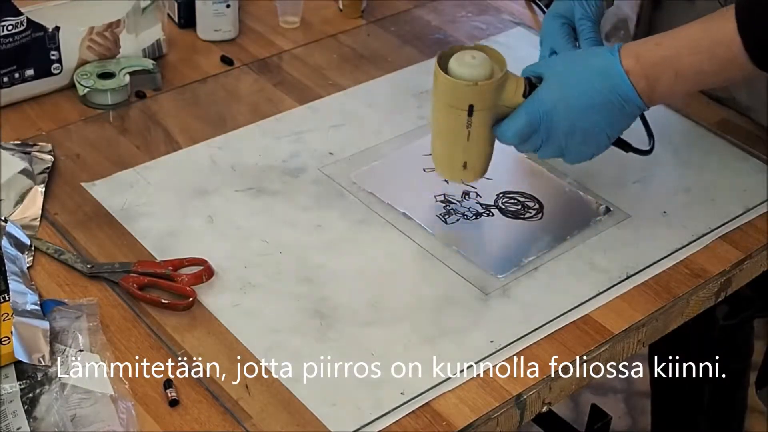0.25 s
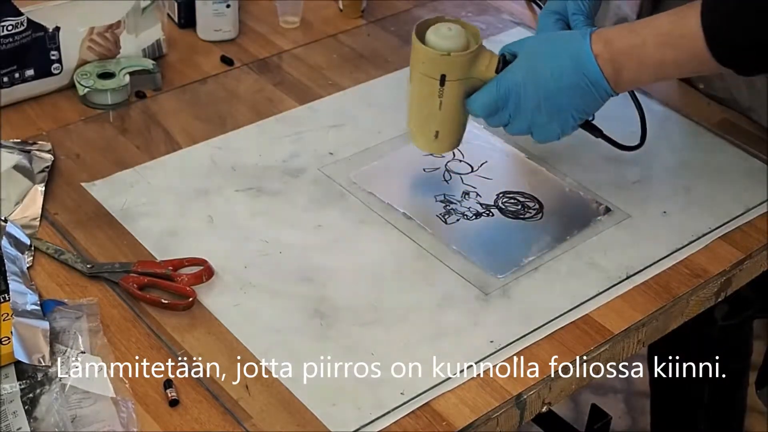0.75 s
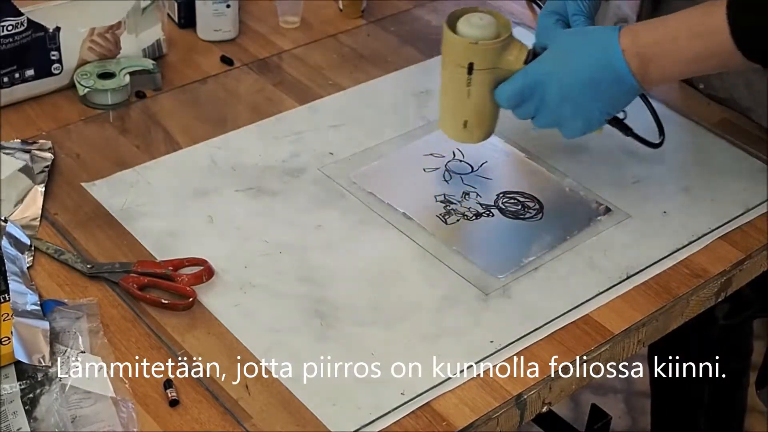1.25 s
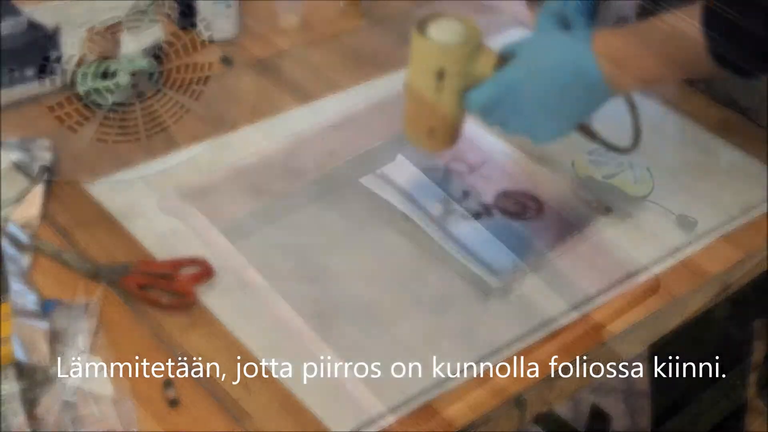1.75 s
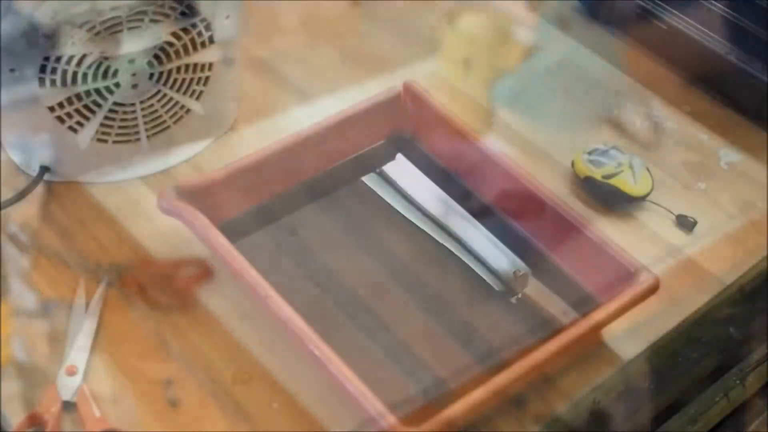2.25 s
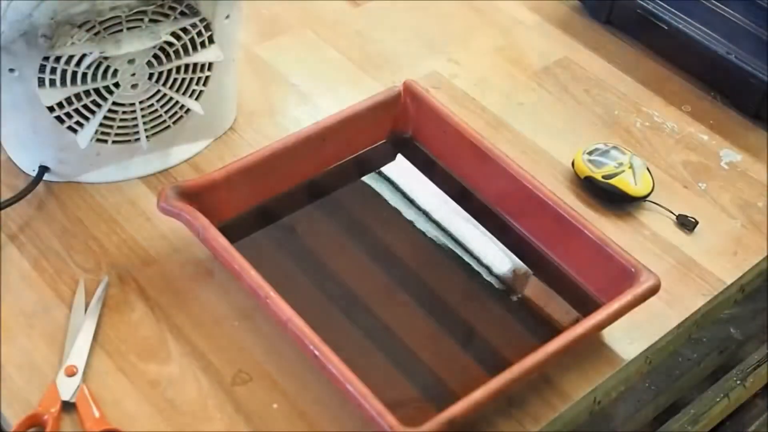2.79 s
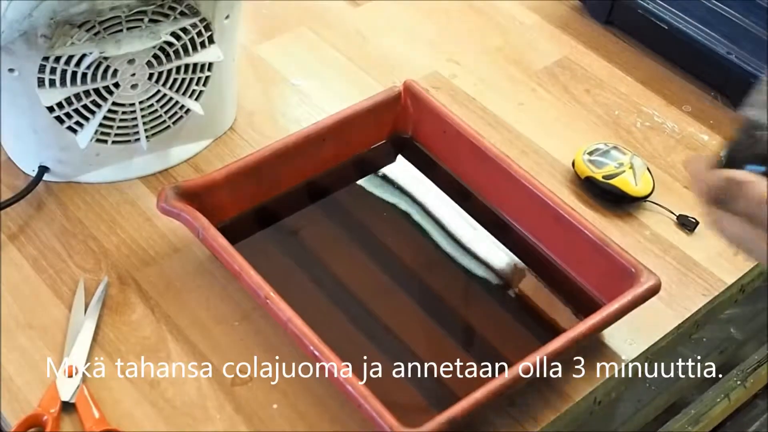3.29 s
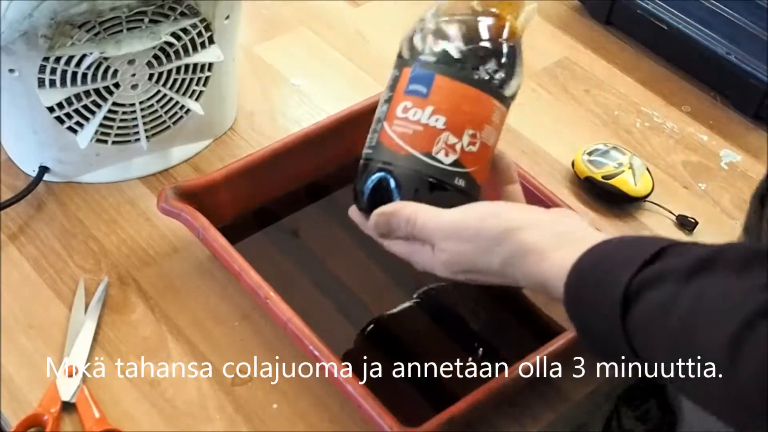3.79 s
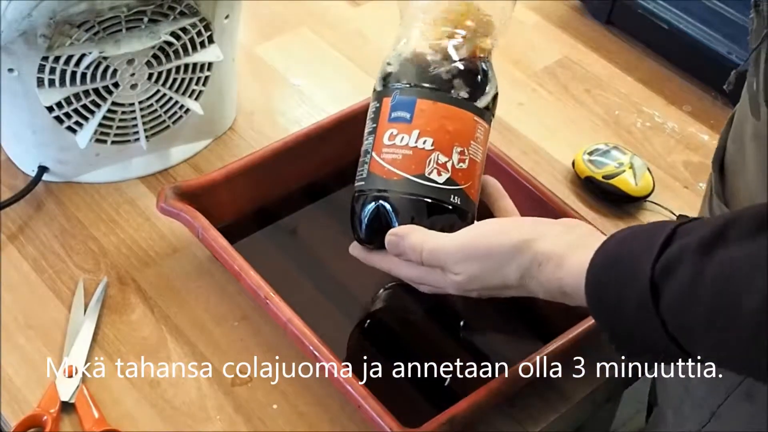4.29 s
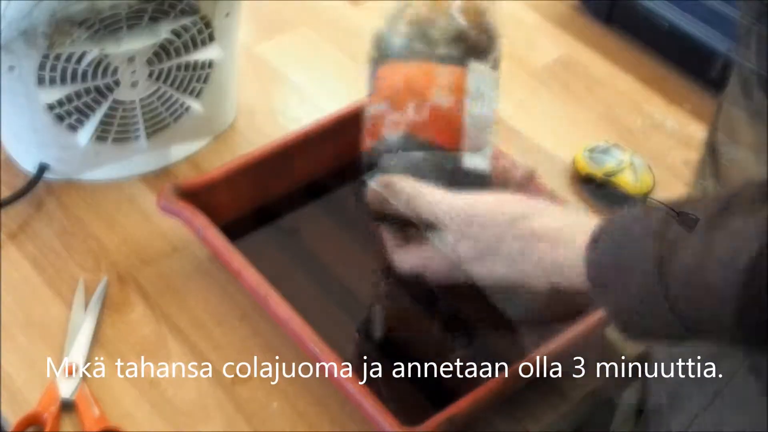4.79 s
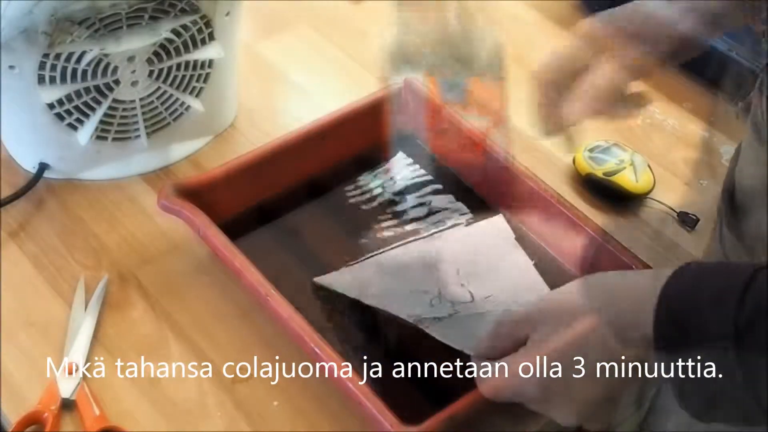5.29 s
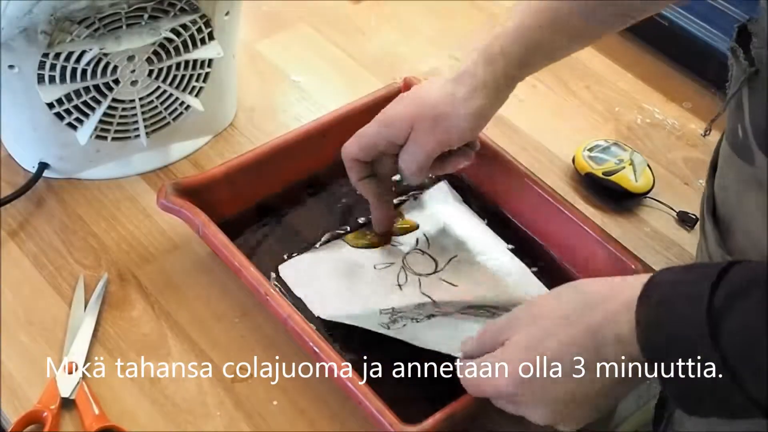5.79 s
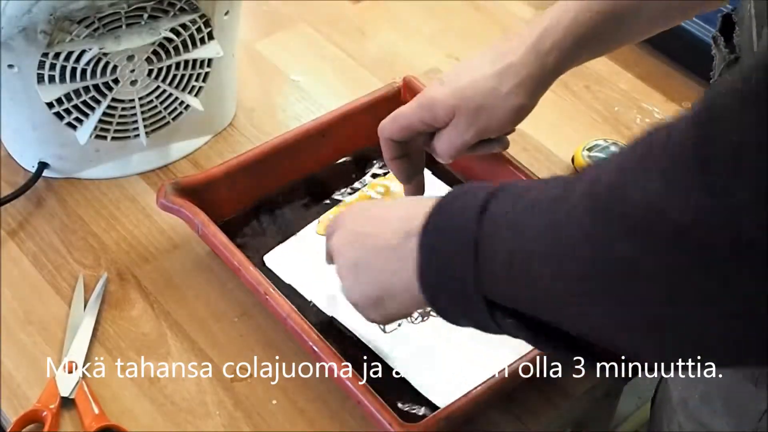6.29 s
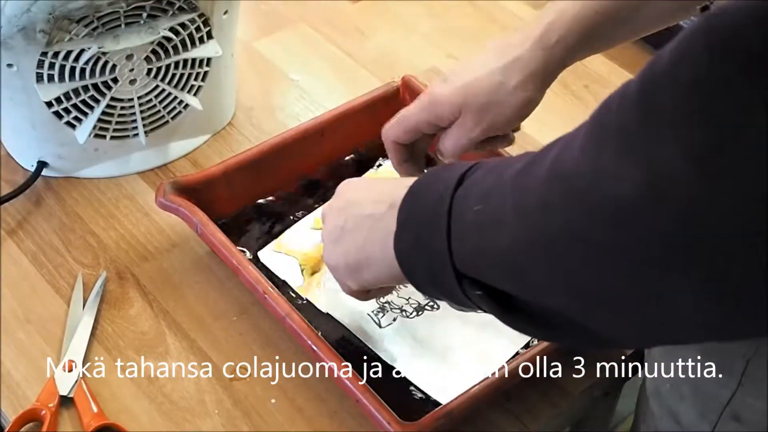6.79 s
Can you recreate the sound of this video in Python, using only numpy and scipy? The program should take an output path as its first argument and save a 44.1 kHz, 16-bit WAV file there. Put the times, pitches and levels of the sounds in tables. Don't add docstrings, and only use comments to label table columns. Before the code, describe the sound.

A small hair dryer blows close over a table, a steady piercing whine above rushing hiss and low hum, wavering slightly as it moves. It fades smoothly to nothing around three seconds. A quiet indoor workroom remains, with light table knocks, soft sleeve swishes, a sharp crack of a plastic bottle set down near five seconds, then a tray knock and small wet paper flicks and squeaks. Close small stereo microphone, slightly dull at the very top.

```python
import sys
import numpy as np
from scipy import signal
from scipy.fft import rfft, irfft, next_fast_len
from scipy.io import wavfile

SR = 44100
rng = np.random.default_rng(int(sys.argv[2]) if len(sys.argv) > 2 else 0)


def volts_from_db(level):
    exponent = np.asarray(level, float) / 20
    return 10 ** exponent


def bounce(signal):
    frames = np.transpose(np.atleast_2d(signal))
    limited = np.clip(frames, -1, 1)
    pcm = np.round(limited * 32767).astype(np.int16)
    wavfile.write(sys.argv[1], SR, pcm)


N = 310905


def rms_one(x):
    return x / np.sqrt(np.mean(x ** 2) + 1e-20)


def in_time(rows):
    s, *columns = np.transpose(rows)
    return [np.interp(np.arange(N) / SR, s, c) for c in columns]


def at_hz(points, hz):
    point_hz, value = np.transpose(points)
    return np.interp(np.log(hz), np.log(point_hz), value)


def drift(rate):
    r = np.exp(-80 * np.pi * rate / SR)
    slow = signal.lfilter([1], [1, -2 * r, r * r], rng.standard_normal(N // 40 + 2002))[2000:]
    return np.interp(np.arange(N) / 40, np.arange(len(slow)), rms_one(slow))


def ring(clicks, hz, t60):
    r, w = volts_from_db(-60 / (t60 * SR)), 2 * np.pi * hz / SR
    return signal.lfilter([0, np.sin(w)], [1, -2 * r * np.cos(w), r * r], clicks + 1e-18)


def coloured(spectrum, likeness, grain_db=0):
    size = next_fast_len(N)
    grain = np.minimum(rng.exponential(1, size), 4)
    white = rng.standard_normal((2, size)) * volts_from_db(grain_db * grain)
    hz = np.maximum(np.fft.rfftfreq(size, 1 / SR), 10)
    mid, side = rfft(white) * volts_from_db(at_hz(spectrum, hz))
    alike = np.clip(at_hz(likeness, hz), 0, 1)
    mid, side = mid * np.sqrt(1 + alike), side * np.sqrt(1 - alike)
    return rms_one(irfft(np.array([mid + side, mid - side]), size)[:, :N])


def highpass(x, order, hz):
    return signal.sosfilt(signal.butter(order, hz, "high", fs=SR, output="sos"), x)


FADE_END_S = 2.985


def fade():
    return np.cos(np.pi / 2 * np.minimum(np.arange(N) / SR / FADE_END_S, 1))


# frequency in Hz, level in dB per Hz.
ROOM_TONE = [(20, -19), (60, -2), (170, 0), (410, -4.5), (1000, -9), (1400, -19.5), (1660, -12.5),
             (2320, -18.5), (4300, -21), (5000, -25.5), (10500, -24.5), (12300, -34.5), (13800, -35),
             (15800, -35)]
# frequency in Hz, left-right likeness from 0 to 1.
ROOM_LIKENESS = [(60, 0.48), (240, 0.69), (950, 0.64), (3770, 0.064), (10000, .1), (13000, .6)]
# time in seconds, level in dB.
ROOM_LEVEL = [(2.95, -44), (3.25, -44), (3.5, -46), (3.97, -45.5), (4.25, -47), (4.81, -46.5),
              (4.96, -42.5), (5.26, -53), (6.12, -55), (6.6, -52.5), (7.05, -51)]
ROOM_UNDER_DB, ROOM_RISE = -25, 1.23
ROOM_SWAY_DB = .9


def room_tone():
    level_db, = in_time(ROOM_LEVEL)
    under_db = ROOM_UNDER_DB * fade() ** ROOM_RISE
    gain = volts_from_db(level_db + under_db - 2.5 + ROOM_SWAY_DB * drift(3.8))
    return gain * coloured(ROOM_TONE, ROOM_LIKENESS)


ROOM_T60_S, WALL_CUT_HZ, ECHO_DB = 0.33, 7400, -26


def room_echo(x):
    out, dull = np.zeros((2, N)), np.exp(-2 * np.pi * WALL_CUT_HZ / SR)
    lags = (rng.uniform(.012, 0.037, 12) * SR).astype(int)
    for k, lag in enumerate(lags):
        loop, gain, state = x.copy(), volts_from_db(-60 * lag / SR / ROOM_T60_S), [0.]
        for i in range(lag, N, lag):
            back, state = signal.lfilter([gain * (1 - dull)], [1, -dull], loop[i - lag:i], zi=state)
            loop[i:i + lag] += back[:N - i]
        out[k % 2] += (loop - x) * (-1) ** (k // 2)
    return volts_from_db(ECHO_DB) * out


# peak time in seconds, rise in seconds, fall in seconds,
# scuff level in dB, extra brightness in dB.
STROKES = [(2.77, 0.37, 0.23, -36, 1), (3.02, 0.19, 0.34, -70, -11), (3.16, .08, 0.22, -55, 1),
           (3.24, 0.3, 0.15, -52.5, 4), (3.32, .06, 0.075, -52, -1), (3.5, 0.96, .4, -61, -8),
           (3.73, 0.31, 0.2, -45.5, -3), (3.85, 0.15, 0.36, -44.5, -7.5), (4.0, 0.26, 0.52, -57.5, -9),
           (4.62, 0.2, 0.2, -63.5, 4), (4.69, 0.076, 0.064, -53, 15.5), (4.85, 0.98, 0.16, -58.5, -7),
           (4.96, 0.14, 0.37, -53.5, -3.5), (5.62, 0.19, 0.47, -57.5, -20.5), (5.86, 0.19, 0.39, -51, -3.5),
           (6.04, 0.029, 0.23, -46.5, 11.5), (6.13, 0.15, 0.056, -53.5, 10), (6.2, 0.084, 0.36, -55, -13),
           (6.6, 0.14, 0.57, -59, -31.5), (6.78, 0.34, 0.3, -72, -37), (7.05, 0.14, .3, -58, -32)]
AT_REST_DB = [-67.5, -75.5, -92]
STROKE_RANGE_DB, BRIGHT_STEEPER = 27, 1.44
RUB_DB, RUB_PER_BRIGHT = -7, -0.52


def strokes():
    t = np.arange(N) / SR
    out = np.ones((3, N)) * volts_from_db(np.array(AT_REST_DB))[:, None]
    for s, rise_s, fall_s, scuff_db, bright_db in STROKES:
        near = slice(round((s - 3 * rise_s) * SR), round((s + 3 * fall_s) * SR))
        lost_db = STROKE_RANGE_DB * np.maximum((s - t[near]) / rise_s, (t[near] - s) / fall_s)
        rub_db = RUB_DB + RUB_PER_BRIGHT * bright_db
        for k, (lift_db, steep) in enumerate([(rub_db, 1), (0, 1), (bright_db, BRIGHT_STEEPER)]):
            stroke = volts_from_db(scuff_db + lift_db - steep * lost_db)
            out[k, near] = np.hypot(out[k, near], stroke)
    return out


# frequency in Hz, level in dB per Hz.
RUB = [(300, -6), (650, 10.5), (1250, 6.5), (1750, 11), (2500, -1), (4200, -1.5), (6000, -67)]
SCUFF = [(1200, -15), (1800, -8), (2800, 3), (4300, 1.5), (6000, -6.5), (8000, -7), (11000, -36)]
CLOTH = [(3500, -20), (5500, -7), (8000, -2), (10000, 0), (11500, -4), (13000, -12), (15000, -12),
         (16000, -9)]
# start in seconds, bright peak in dB, time to fall 60 dB in seconds,
# scuff share in dB.
FLICKS = [(3.1377, -41, 0.05, -11), (3.274, -43, .06, -28), (3.283, -44, .07, -28), (3.291, -48, .04, -25),
          (3.3797, -49, 0.15, -16), (4.681, -46, .07, -14), (4.8554, -49, 0.036, -13),
          (5.0035, -49, .06, -15), (5.0644, -47, .052, -10), (5.1044, -53, 0.041, -4),
          (5.36, -44.5, 0.055, -9), (5.379, -44.5, 0.054, -10), (5.5049, -45.5, 0.058, -8),
          (5.5748, -36, 0.084, -12), (5.612, -37, 0.045, -10), (5.757, -41.5, 0.07, -9),
          (5.7794, -53, .05, -4), (5.832, -58, .1, -14), (5.843, -49, .05, -17), (5.862, -36, 0.05, -22),
          (5.865, -41, 0.15, -18), (3.8785, -46, .02, 3), (3.884, -48, .02, 2), (6.012, -54, .1, -10),
          (5.9394, -50, 0.04, -9), (6.024, -41, .14, -17), (6.577, -53, 0.063, -1), (7.0, -80, 0.83, -4)]
RUB_SWAY_DB = 1.2


def rustles():
    rub_gain, scuff_gain, bright_gain = strokes()
    start = np.clip((np.arange(N) / SR - 2.6) / 0.36, 0, 1)
    close = [(500, 1.0), (8000, 0.56)]   # Hz, left-right likeness
    flick, t = np.zeros((2, N)), np.arange(N // 20) / SR
    for s, peak_db, t60, share_db in FLICKS:
        i = round(s * SR)
        onset = np.minimum(t / 0.00061, 1)
        fall = volts_from_db(peak_db - 2.5 - 60 * t / max(t60, .01)) * onset
        flick[:, i:i + len(t)] += fall[:N - i] * volts_from_db([[share_db + 7.0], [0]])
    fibres = 1.1 * drift(30)
    rub = rub_gain * volts_from_db(RUB_SWAY_DB * drift(25)) * coloured(RUB, close, grain_db=-4.5)
    scuff = (scuff_gain * volts_from_db(0.6 + fibres) + flick[0]) * coloured(SCUFF, close, grain_db=3.0)
    cloth = (bright_gain * volts_from_db(fibres) + flick[1]) * coloured(CLOTH, close, grain_db=3.0)
    return start * (rub + scuff + cloth) * volts_from_db([[.3], [-.3]])


# frequency in Hz, level in dB per Hz.
SWEEP = [(710, -31), (1200, -6), (1330, -14), (1650, -4), (2120, -3.5), (4590, -2), (10600, -5.5),
         (12900, -16), (15000, -16)]
# peak time in seconds, rise in seconds, fall in seconds, level in dB.
SWEEPS = [
    (3.63, 0.34, 0.21, -45.5),
    (3.725, 0.2, 0.2, -38),
    (3.755, .1, .15, -42),
    (3.85, 0.22, 0.17, -34.5),
    (3.885, 0.11, 0.13, -45),
    (4.69, .06, .06, -46),
]


def sweeps():
    t, power = np.arange(N) / SR, 0
    for s, rise_s, fall_s, level_db in SWEEPS:
        lost_db = STROKE_RANGE_DB * np.maximum((s - t) / rise_s, (t - s) / fall_s)
        power = power + volts_from_db(level_db - lost_db) ** 2
    swish = coloured(SWEEP, [(500, 1.0), (8000, 0.2)], grain_db=0.0)
    return np.sqrt(power) * volts_from_db(.8 * drift(45)) * swish


# start in seconds, length in seconds, pitch in Hz, level in dB.
SQUEAKS = [(5.611, .014, 3650, -52), (5.612, 0.017, 2700, -57), (5.862, .02, 3840, -48),
           (5.896, 0.033, 3900, -53), (6.04, 0.053, 10300, -44), (6.046, 0.037, 4230, -48),
           (6.189, .03, 2600, -52.5), (3.723, .03, 1800, -53), (4.648, .04, 7550, -52),
           (4.682, .014, 5900, -48), (4.686, .014, 9000, -47), (5.584, .012, 3900, -50),
           (3.2, .05, 3100, -55)]
SQUEAK_WIDTH = 0.08


def squeaks():
    out = np.zeros(N)
    for s, length_s, hz, level_db in SQUEAKS:
        n, i = round(length_s * SR), round(s * SR)
        edges_hz = [hz * (1 - SQUEAK_WIDTH / 2), hz * (1 + SQUEAK_WIDTH / 2)]
        band = signal.butter(2, edges_hz, "band", fs=SR, output="sos")
        puff = rms_one(signal.sosfilt(band, rng.standard_normal(4000))[-n:])
        out[i:i + n] += volts_from_db(level_db) * puff * np.sin(np.pi * (np.arange(n) / n) ** .5)
    return out


# start in seconds, level in dB, pitch in Hz,
# time to fall 60 dB in seconds.
BUMPS = [
    (1.989, -31, 145, 0.083),
    (1.99, -47, 70, .15),
    (1.998, -39, 250, .05),
    (2.836, -50, 110, .1),
    (2.838, -46, 350, .06),
    (3.108, -46, 330, .06),
    (4.862, -48, 620, .12),
    (4.875, -50, 450, .1),
    (4.96, -50, 520, .12),
]


def bumps():
    out, click = np.zeros(N), np.eye(1, N // 20)[0]
    for s, level_db, hz, t60 in BUMPS:
        out[round(s * SR):][:len(click)] -= volts_from_db(level_db) * ring(click, hz, t60)
    return out


# pitch in Hz, level in dB,
# time to fall 60 dB in seconds.
TABLE = [(133, -3, 0.058), (171.7, -1.5, 0.15), (223, -13.5, 0.079), (265, -4.5, 0.13), (316, -5, 0.13)]
TRAY = [(393, 11, 0.027), (488, 5, 0.095), (578, 11, 0.055), (705, 4.5, 0.16), (765, 1, 0.065),
        (880, -4, 0.1), (995, 10.5, 0.06), (1210, -9, 0.045)]
EDGE = [(1340, -2, 0.062), (1490, 4, 0.027), (1644, 13.5, 0.035), (2040, 13.5, 0.033), (2340, 2, 0.02),
        (2600, 10, 0.036), (3030, 2, 0.036), (3580, 8, 0.016), (3650, -10, 0.017), (4150, -25, 0.013),
        (5100, -5, 0.016)]
CRACK = [(5470, -15, 0.005), (6330, -6, 0.011), (7500, -5.5, 0.0081), (8600, -3, 0.0051),
         (9600, -1.5, 0.0072), (10900, -1, 0.0043), (13800, -11, .005)]
# start in seconds, then the level in dB in table, tray, hard edge and crack.
KNOCKS = [(1.993, -40, -53, -65, -65), (2.697, -48, -51.5, -66, -76), (2.836, -54, -45.5, -61, -48),
          (3.063, -49, -48, -72, -62), (3.106, -38.5, -53, -68, -68), (3.138, -42, -61, -52.5, -49),
          (3.298, -47, -62, -44, -75), (3.351, -39, -60, -60, -60), (4.378, -46, -64, -76, -70),
          (4.629, -47, -66, -66, -80), (4.86, -40, -59, -63, -59), (4.884, -62, -57, -69, -58),
          (4.918, -33.5, -50, -46.5, -18.5), (5.49, -69, -64, -74, -70), (5.538, -38.5, -50, -53, -35),
          (5.593, -48, -55, -63, -58), (6.19, -59, -63, -60, -74), (6.229, -46, -66, -85, -95)]


def knocks():
    rows = np.array(KNOCKS)
    at = np.round((rows[:, 0] + 0.00106) * SR).astype(int)
    after_s = rng.uniform(0.00147, 0.0081, (len(at), 5))
    rattles = at[:, None] + (after_s * SR).astype(int)
    out = np.zeros(N)
    for column, body in enumerate([TABLE, TRAY, EDGE, CRACK]):
        for hz, level_db, t60 in body:
            clicks = np.zeros(N)
            uneven_db = rng.normal(0, 1.5, len(at))
            size = volts_from_db(rows[:, 1 + column] + level_db - 1.5 + uneven_db)
            clicks[at] = size * rng.choice([-1, 1], len(at))
            weaker = volts_from_db(-6.5 - 2000 * after_s) * rng.standard_normal(after_s.shape)
            clicks[rattles] = size[:, None] * weaker
            out += ring(clicks, hz, t60)
    return highpass(out, 4, 120)


# pitch in Hz, level in dB, time to fall 60 dB in seconds.
CAP = [(590, 7, 0.075), (714, 4, 0.035), (750, 11.5, 0.036), (970, 9, 0.043), (1210, -2, .02),
       (1530, -5, 0.022), (1890, 4.5, .03), (2350, -11, .03), (2810, 12.5, 0.025), (3280, 3, 0.033),
       (3840, -11, 0.018), (4600, -10, .012)]
BOTTLE = [(640, 0, .1), (707, -2, 0.069), (795, 4.5, 0.063), (1070, -8, .03), (1266, -1, 0.069),
          (1630, -14, .07), (2200, -11, 0.05), (2460, -1, 0.032), (2760, -3.5, 0.045), (3520, -10, 0.055),
          (4200, -3, 0.032)]
RIM = [(584, -12, 0.055), (790, 1, 0.11), (892, 11.5, 0.057), (1077, 5, 0.06), (1260, -7, .03),
       (1520, -8, 0.078), (2140, 0, 0.033), (2430, -12, .03), (2920, -21, .033), (3900, -5, 0.022)]
THUD = [(170, 13, 0.083), (202, 18, 0.09), (250, 8, .06), (670, 4, .06)]
FLOOR = [(285, 14, 0.055), (161, 4.4, 0.098), (560, 6, .07)]
TICK = [(2100, -4, .01), (3400, 0, .012), (8900, 4, .02), (10200, 3, .018), (11300, -2, .015)]
# start in seconds, blow level in dB,
# the thing that rings.
HELD = [(2.8385, -50, CAP), (3.2993, -40, CAP), (4.863, -57, THUD), (4.95, -56, THUD),
        (4.9196, -30, BOTTLE), (4.936, -50, THUD), (5.5396, -36, RIM), (5.5445, -49, FLOOR),
        (5.5935, -50, RIM), (5.5965, -50, RIM), (5.604, -49, RIM), (5.65, -56, RIM), (5.491, -59, RIM),
        (5.5395, -45, FLOOR), (4.9197, -50, FLOOR), (3.3057, -55, CAP), (3.316, -63, CAP),
        (4.9255, -42, TICK), (4.9345, -50, TICK), (5.577, -57, RIM)]
CONTACT_HZ, SMALL_BODY_HZ = 5000, 150
SNAP_DB, SNAP_HZ = -2, 3000
BURST_DB, BURST_T60_S, BURST_LOW_HZ, BURST_HIGH_HZ = -0.5, 0.1, 350, 4170


def held_knocks():
    out, t = np.zeros(N), np.arange(N // 20) / SR
    band = signal.butter(2, [BURST_LOW_HZ, BURST_HIGH_HZ], "band", fs=SR, output="sos")
    for s, blow_db, modes in HELD:
        i = round(s * SR)
        contact_hz = CONTACT_HZ * (3 if modes == TICK else 1)
        click = signal.lfilter(*signal.butter(2, contact_hz, fs=SR), np.eye(1, len(t))[0])
        hit = volts_from_db(blow_db + SNAP_DB) * ring(click, SNAP_HZ / 2, 2 / SNAP_HZ)
        for hz, level_db, t60 in modes:
            hit += volts_from_db(blow_db + level_db) * ring(click, hz, min(t60, .09))
        burst = rng.standard_normal(len(t)) * volts_from_db(blow_db + BURST_DB - 60 * t / BURST_T60_S)
        out[i:i + len(t)] += hit + signal.sosfilt(band, burst)
    return highpass(out, 4, SMALL_BODY_HZ)


def lift(x, hz, width_hz, lift_db):
    r = np.exp(-np.pi * width_hz / SR)
    top = np.array([1, 0, -1]) * (1 - r * r) / 2
    peak = signal.lfilter(top, [1, -2 * r * np.cos(2 * np.pi * hz / SR), r * r], x)
    return x + (volts_from_db(lift_db) - 1) * peak


# frequency in Hz, level in dB per Hz.
ROAR = [(35, -68), (60, -30), (199, -27), (260, -16.5), (324, -18), (1030, -8), (1430, -12), (1810, -6.5),
        (2190, -23.5), (2600, -9), (3380, -59), (5720, -120)]
HISS = [(1120, -23), (1900, -7.5), (1970, -9), (2170, -14), (2640, -7.5), (3510, -6), (3880, -6.5),
        (4240, -7), (5540, -10.5), (5890, -14), (6440, -10.5), (10800, -13.5), (13300, -27.5), (16000, -29)]
# frequency in Hz, left-right likeness from 0 to 1.
DRYER_LIKENESS = [(60, 1), (130, 1), (290, 1), (640, 1), (1410, 0.9), (3100, 0.92), (6820, 0.72),
                  (10000, .78), (12500, 0.97)]
# frequency in Hz, width in Hz, lift in dB.
DUCT = [(260, 40, 6), (330, 20, -5), (400, 50, 6), (460, 20, -6), (525, 30, 6.5), (570, 20, 5),
        (682, 25, 8.5), (720, 30, -6), (790, 30, 4), (835, 20, -8), (898, 50, 9.5), (985, 20, -7),
        (1020, 40, 9), (1092, 15, -8), (1118, 25, 5), (1180, 20, -6), (1215, 40, 4.5), (1460, 60, -4),
        (1510, 40, 4), (1680, 100, 3), (2580, 120, 5), (2705, 40, 4), (2950, 25, 3), (2990, 50, 4),
        (3040, 40, -5), (3078, 30, 7), (3120, 30, 3), (3345, 30, 2.5)]
HISS_DB, ROAR_DB, NEAR_ECHO_DB = -21.6, -27.9, -16
HISS_SWAY_DB = .35
HISS_FADE_POWER = 1.173


def blown_air():
    roar = volts_from_db(ROAR_DB - 4.0 + 0.13 * drift(3.3)) * coloured(ROAR, DRYER_LIKENESS)
    hiss = volts_from_db(HISS_DB - 0.56 + HISS_SWAY_DB * drift(9.1)) * coloured(HISS, DRYER_LIKENESS)
    air = highpass(roar + fade() ** (HISS_FADE_POWER - 1) * hiss, 2, 100)
    heard, blowing = 3 * SR + 9000, 3 * SR
    for resonance in DUCT:
        air[:, :heard] = lift(air[:, :heard], *resonance)
    direct = air[:, :blowing].copy()
    for lag in (rng.uniform(.003, .03, 6) * SR).astype(int):
        air[:, lag:lag + blowing] += volts_from_db(NEAR_ECHO_DB) * drift(2.5)[:blowing] * direct
    return air


# time in seconds,
# blade rate in Hz, first, second and third tone in dB.
WHINE = [(0, 1871, -25.5, -34, -42), (.44, 1873, -23.5, -37.5, -45), (.62, 1873, -25, -35, -45),
         (.73, 1871, -31, -34, -41), (.87, 1871, -28, -34.5, -37), (.95, 1871, -30, -30, -38),
         (1.08, 1871, -26, -42, -41), (1.22, 1871.5, -28, -44, -39), (1.3, 1872, -32.5, -32, -39),
         (1.38, 1872, -29, -31, -40), (1.5, 1872.5, -29, -43, -43), (1.67, 1873.5, -34, -35, -45),
         (1.8, 1874, -29, -44, -53), (1.98, 1874, -35, -33, -45), (2.14, 1874, -34, -42, -48),
         (2.55, 1874.5, -39.5, -47, -54), (2.86, 1874.5, -47, -50, -63), (2.97, 1874.5, -62, -61, -77)]
TONE_LAG = [.1, .35, .4]
BLADE_COUNT = 7


def blade_whine(turn):
    _, *tone_db = in_time(WHINE)
    whine = 0
    for k, level_db in enumerate(tone_db):
        lag = TONE_LAG[k] * (1 + .5 * drift(3.3))
        flutter_db = (1.4 + .8 * k) * drift(18)
        phase = (k + 1) * BLADE_COUNT * turn + np.outer([1, -1], lag)
        whine = whine + volts_from_db(level_db + 5.0 + flutter_db) * np.sin(phase)
    return whine


# multiple of the shaft rate, level in dB.
SHAFT = [(1, -41.5), (2, -47), (3, -38), (4, -34.5), (5, -38.5), (6, -36.5), (25, -36.5), (35, -39)]


def shaft_hum(turn):
    tones = 0
    for multiple, level_db in SHAFT:
        wobble = volts_from_db(level_db + ROAR_DB + 24 + 2.5 * drift(8))
        tones = tones + wobble * np.sin(round(multiple) * turn + rng.uniform(0, 6.8))
    return tones


def dryer():
    blade_hz = in_time(WHINE)[0] + 0.66 * drift(3.9)
    turn = 2 * np.pi * np.cumsum(blade_hz) / BLADE_COUNT / SR
    body = fade() * (blown_air() + shaft_hum(turn))
    whine = np.minimum(50 * fade(), 1) * blade_whine(turn)
    return (body + whine) * volts_from_db([[.35], [-.35]])


def scene():
    hits = knocks() + held_knocks() + squeaks() + bumps()
    hands = rustles() + sweeps() + hits * volts_from_db([[.3], [-.3]])
    return room_tone() + room_echo(hits) + hands + dryer()


def low_pass(x):
    return signal.sosfilt(signal.butter(12, 16510, fs=SR, output="sos"), x)


CUTOFF_HZ = 15950


def record(dry):
    cut = signal.sosfilt(signal.ellip(12, .3, 30, CUTOFF_HZ, fs=SR, output="sos"), dry)
    return low_pass(cut)


dry = scene()
out = record(dry)
bounce(out)
```